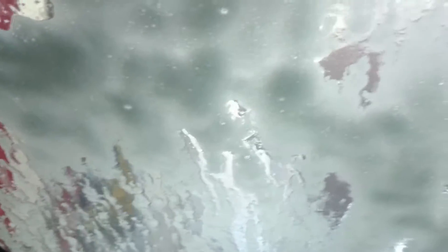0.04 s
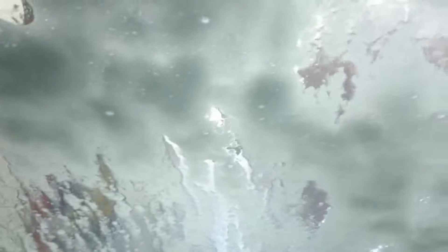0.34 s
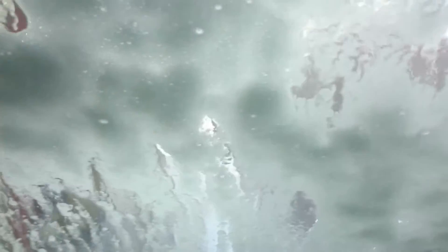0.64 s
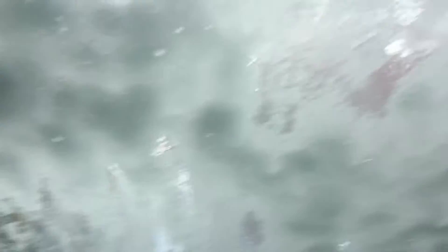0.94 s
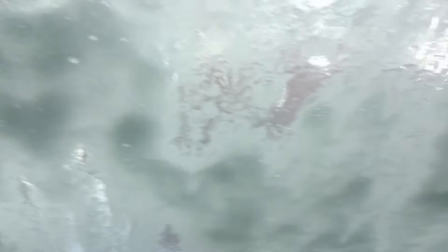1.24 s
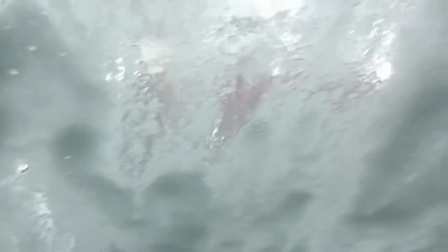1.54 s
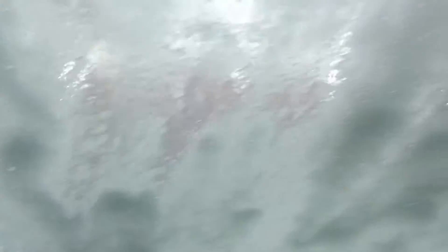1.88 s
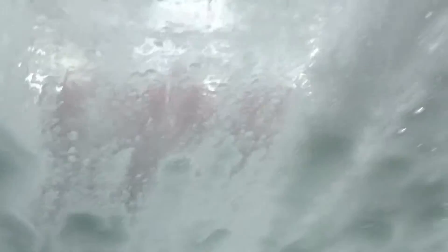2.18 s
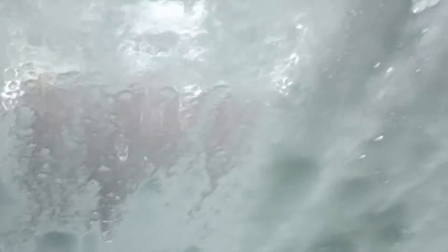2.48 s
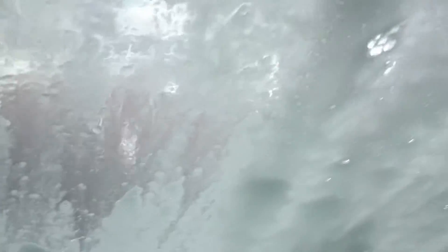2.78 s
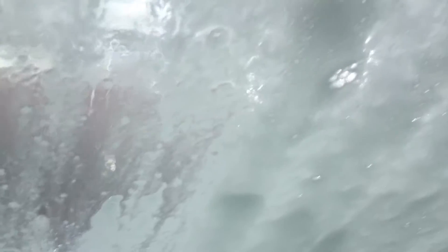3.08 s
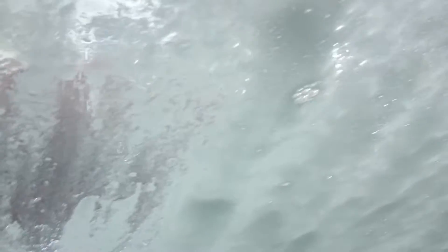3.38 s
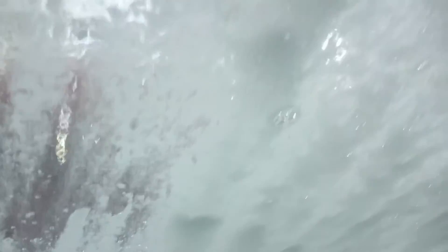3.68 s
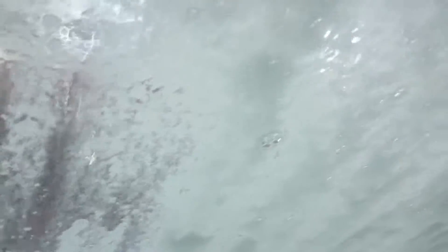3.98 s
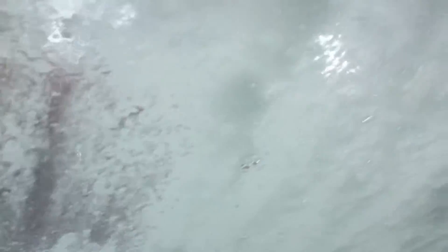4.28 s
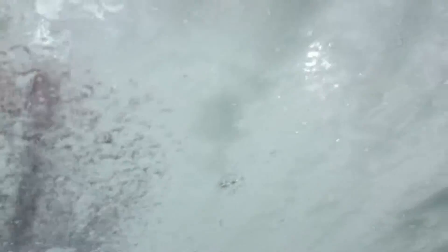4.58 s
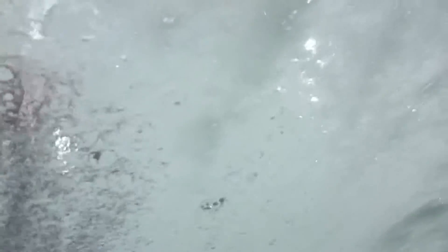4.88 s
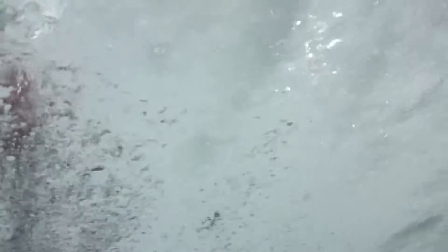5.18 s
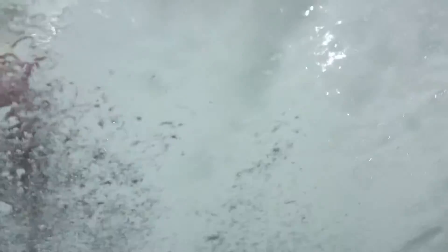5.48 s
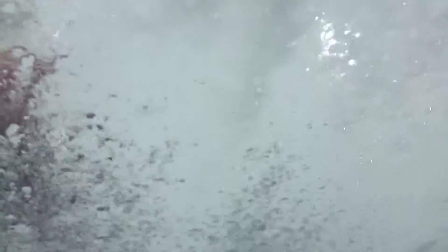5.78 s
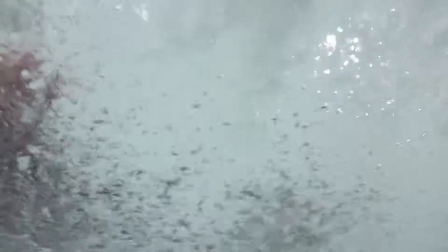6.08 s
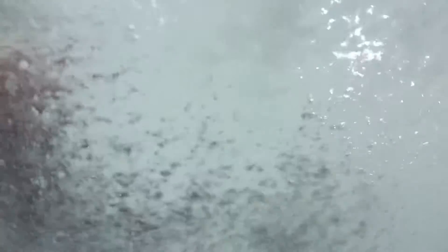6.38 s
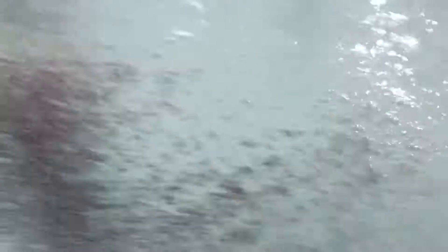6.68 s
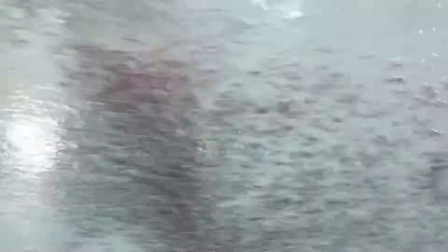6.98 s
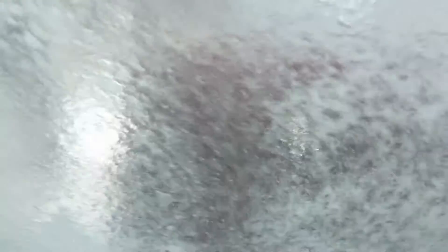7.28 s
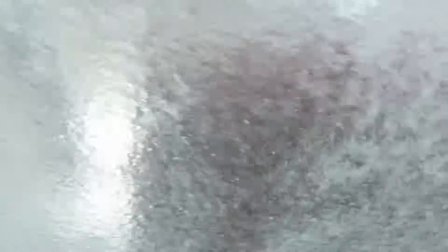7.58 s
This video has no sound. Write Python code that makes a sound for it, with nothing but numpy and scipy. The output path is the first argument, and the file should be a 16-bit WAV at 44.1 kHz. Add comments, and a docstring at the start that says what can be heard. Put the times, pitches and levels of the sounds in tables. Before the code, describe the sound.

Car wash heard from the cabin: rumbling spray, a wavering motor hum, and soaked brush strips thumping the panels and splattering the windshield.

```python
"""Water jets drum and hiss on a car in an automatic car wash, heard from inside, while drive motors hum.
A spinning cloth brush closes in: its wet strips thump the panels and slap the windshield ever harder,
throwing fat drops and a fine spray. The water is a mass of tiny random impacts, the shaking body is
mostly low noise, and thumps and fat drops are short tones. A few sharp ticks sound close by on the right."""
import sys
import numpy as np
from scipy import signal
from scipy.fft import rfft, irfft, next_fast_len
from scipy.io import wavfile
from scipy.ndimage import uniform_filter1d, map_coordinates

SR = 44100
rng = np.random.default_rng(int(sys.argv[2]) if len(sys.argv) > 2 else 0)


def dump(signal):
    """Clip the signal to [-1, 1] and save it as 16-bit WAV at the path in sys.argv[1]."""
    limited = np.clip(np.atleast_2d(signal).T, -1, 1)
    pcm = np.round(limited * 32767).astype(np.int16)
    wavfile.write(sys.argv[1], SR, pcm)


N = 336924

# How close the brush is: t/s, nearness (0 far, 1 near)
BRUSH_NEARNESS = [(0, 0.15), (.8, 0), (1.5, 0.41), (3.0, 0.45), (4.0, 0.62), (5.6, 0.74), (7.64, 1)]
# Loudness over time, each as rows of: t/s, level/dB (relative)
JET_FORCE = [(0, -2.5), (1.6, 0), (2.0, 0), (3.2, 1), (4.5, -0.6), (5.3, 0.4), (6.2, -2.5), (7.64, -1)]  # the jets pass over the roof
SHUDDER_LEVEL = [(0, -32.5), (1.6, -33.5), (2.05, -30), (2.8, -36), (3.4, -27), (3.95, -30.5), (5.0, -28),
                 (6.2, -35), (7.3, -31.5)]  # deep shaking of the body
WATER_LULL = [(5.98, 0), (6.07, -2), (6.2, -1), (6.25, 0)]  # the water eases for a moment
SHEET_LEVEL = [(0, -37), (1.2, -35), (2.3, -32.5), (3.0, -34), (4.2, -32.5), (4.5, -34.5), (5.8, -32),
               (6.1, -34), (7.64, -34.5)]  # water builds up on the glass, then the brush wipes it thinner
MIST_LEVEL = [(0, -77), (1.6, -73.5), (3.3, -66.5), (4.2, -65), (6.4, -60.5), (7.1, -58.5), (7.64, -50)]  # mist flung onto the glass
ROOF_LEVEL = [(0, -32), (1.6, -37.5), (2.0, -23.5), (2.9, -25.5), (3.3, -36), (4.5, -30), (7.64, -47)]  # the roof's drone
HUM_LEVEL = [(0, 4.5), (.45, -0.5), (.8, 4.5), (1.1, -2), (1.75, 0.5), (2.1, -4.5), (2.45, 1), (2.85, -1),
             (3.05, -11), (3.25, -3), (3.8, -2), (4.0, 2.5), (4.5, -7.5), (4.85, 2.5), (5.7, -1.5),
             (5.92, 3), (6.08, -6.5), (6.8, 0), (7.64, -1)]  # the motors' hum swells and sinks
# Two drive motors, nearly in step: f/Hz, level/dB
MOTOR_TONES = [(512.5, -36.5), (503, -41)]

# The hardest strips on the glass: t/s, strength/dB, brightness/dB, flatness of the landing/dB
HARD_STRIPS = [(1.9544, -33, -7, -4), (2.4094, -37, -12.5, -7.5), (2.6733, -33.5, -11, 2),
               (3.1847, -29, -11.5, -6), (3.255, -28.5, -9, -2.5), (3.335, -29.5, -1.5, -3.5),
               (3.683, -36, 3, 8.5), (3.9554, -36.5, -6, 4), (4.121, -33, -12.5, -11),
               (4.2258, -27, -5, -8), (4.3244, -32, -12, -0.5), (4.552, -36.5, 5.5, -4),
               (4.6299, -32, 2, 5.5), (4.6527, -26, -1, -1.5), (4.7247, -25.5, -2.5, -7),
               (4.7677, -28, -4, 5.5), (4.795, -29, -3.5, -3.5), (4.8728, -29, -9, 1.5),
               (4.9538, -26, 0, -0.5), (4.9816, -23, -4, -6), (5.062, -26, -6.5, -1.5),
               (5.1407, -28, 1, 4.5), (5.2388, -32.5, -12, 3), (5.279, -26.5, -3, 1.5),
               (5.445, -31, -9.5, -1), (5.5095, -34, 4, -3.5), (5.5653, -28, -1, -4), (5.6293, -25, -1, -2),
               (5.675, -34.5, -7, 2.5), (5.7059, -26, -2, -6), (5.8067, -23, -6.5, 1),
               (5.840, -23, 4.5, -13), (5.896, -22.5, -9, -3), (5.9166, -27.5, -1.5, -1),
               (5.965, -24.5, -2, -8), (6.113, -25, -5.5, -11), (6.2327, -28.5, -3, -7.5),
               (6.261, -31, 2.5, -8), (6.3045, -24, -4, -4.5), (6.355, -32, -5.5, -1.5),
               (6.415, -36.5, 1, -1.5), (6.4634, -25, -3, -3.5), (6.5196, -26, -2, -4.5),
               (6.538, -24, -5, -4.5), (6.585, -32, -5.5, -3.5), (6.6543, -25.5, 3, -6.5),
               (6.69, -27.5, -10, -11.5), (6.7046, -23.5, 0.5, -15), (6.7488, -23.5, -1.5, -4.5),
               (6.775, -22.5, -1, -9), (6.795, -21, -5.5, -4.5), (6.8983, -26.5, -2, -4),
               (6.9304, -36, 6, -10), (6.9758, -26.5, 1.5, -6), (7.014, -27.5, 2, -4.5),
               (7.0767, -32.5, 4, -14), (7.128, -30, 0, -1), (7.186, -29, -6, 4.5), (7.205, -25, 0, -1.5),
               (7.238, -25, -0.5, -12.5), (7.2896, -27.5, 3, 2), (7.337, -30.5, 3.5, 3),
               (7.422, -26.5, -4, -3), (7.4747, -27.5, 6, -1), (7.4934, -30.5, 2.5, -3.5),
               (7.5963, -26.5, 0, -6)]
# Heavy blows on the body panels: t/s, peak level/dB, f/Hz, swell time/s
PANEL_BLOWS = [(0.257, -12, 111.7, 0.029), (2.136, -11.5, 114, 0.025), (2.408, -17, 95.5, .014),
               (2.701, -6.5, 84, 0.011), (2.844, -7.5, 107.6, 0.016), (3.605, -9, 113, 0.015),
               (3.776, -8.5, 74, .02), (4.067, -10.5, 76, 0.013), (4.186, -9.5, 81, 0.015),
               (4.328, -8, 81, 0.012), (4.483, -10, 70, .018), (4.738, -9.5, 81, 0.01),
               (5.028, -12, 85, 0.018), (5.212, -12, 88, 0.013), (5.297, -12.5, 79, 0.012),
               (5.423, -5, 79, 0.018), (5.647, -14, 87, .01), (5.785, -13, 73.8, 0.021),
               (5.901, -11, 86, 0.01), (5.966, -9, 72, .034), (6.042, -11, 77, 0.016),
               (6.144, -4.5, 82.5, 0.015), (6.348, -11, 73.5, 0.024), (6.426, -8.5, 76, 0.012),
               (6.548, -12, 73, 0.019), (6.878, -8, 85, 0.014), (6.994, -11, 79.5, 0.012),
               (7.050, -9.5, 74.6, 0.024), (7.253, -13.5, 79.5, 0.011), (7.398, -11, 78.5, .015),
               (7.592, -14.5, 85, 0.015)]
# Close, sharp clicks: t/s, strength/dB, treble cutoff f/Hz
TICK_HITS = [(0.7268, -21, 900), (0.8976, -27.5, 11000), (2.676, -39.5, 11950), (3.2793, -22.5, 16000),
             (3.727, -19.5, 16000), (4.0898, -20.5, 16000), (5.681, -32, 16000), (6.475, -29, 16100)]
# Big drops that make the glass ring: t/s, strength/dB, f/Hz
FAT_DROP_HITS = [(3.682, -24.5, 2370), (3.690, -27.5, 2900), (4.632, -29, 2130), (4.769, -27.5, 2550),
                 (4.954, -27.5, 3960), (4.982, -24, 2650), (5.145, -37, 3980), (5.241, -29.5, 1795),
                 (5.292, -33.5, 3750), (5.509, -27, 3510), (5.564, -26, 3370), (5.840, -22, 3880),
                 (5.967, -35, 4000), (6.234, -33.5, 3700), (6.260, -32.5, 3960), (6.520, -29, 3430),
                 (6.654, -29.5, 3740), (6.794, -29, 3670), (6.930, -36, 3920), (7.014, -26.5, 3970),
                 (7.186, -24, 2100), (7.209, -22, 3620), (7.290, -28, 3650), (7.343, -28.5, 2430),
                 (7.474, -34.5, 3600)]
# Handfuls of droplets on the glass: t/s, level/dB
SPATTER_HITS = [(4.175, -48.5), (4.438, -51.5), (4.648, -47), (4.985, -51), (5.629, -51.5), (5.841, -47.5),
                (6.303, -51), (6.703, -44.5), (7.016, -45)]

# Tone colours (how strong each frequency is), each as rows of: f/Hz, level/dB (relative)
SHUDDER_COLOUR = [(12, -40), (24, -18), (32, -1), (41, 10.5), (52, 13), (66, -14.5), (100, -57.5)]  # deepest shaking of the body
BOOM_COLOUR = [(30, -40.5), (47, -2.5), (57, 15), (72, 15.5), (88, 12.5), (105, -6), (160, -64)]  # brush against the body
PANEL_COLOUR = [(65, -39), (95, -9.5), (113, -1.5), (130, -8.5), (160, -6.5), (195, -16), (260, -28),
                (400, -91)]  # drumming panels
ROAR_COLOUR = [(130, -28.5), (200, -0.5), (250, -2), (320, -1.5), (390, -5.5), (470, -8), (580, -13),
               (720, -19), (1100, -25.5), (3000, -78)]  # jets on the body
SHEET_COLOUR = [(350, -15), (600, -2.5), (820, -5), (1080, -0.5), (1500, -5), (1900, -6), (2400, -13),
                (3500, -22), (7000, -58)]  # sheet of water on the glass
HISS_COLOUR = [(1200, -25), (2200, -1), (2800, 0.5), (3500, -1), (4500, -6), (5300, -13.5), (6300, -21),
               (8000, -33), (15000, -49.5)]  # dense small drops
MIST_COLOUR = [(3500, -18.5), (6500, 6), (8000, 0.5), (9500, -1), (11500, -2), (13500, -6), (16000, -8)]  # finest spray
SMACK_COLOUR = [(130, -21.5), (280, -8.5), (430, 4.5), (750, -3), (1120, 1), (1450, -5.5), (1900, -6),
                (3300, -48.5)]  # a strip knocks the glass
SLAP_COLOUR = [(600, -27.5), (1300, -7), (1850, 3.5), (2400, -1.5), (3000, -6), (4000, -20.5),
               (8000, -46.5)]  # a strip lands flat
SPLASH_COLOUR = [(1500, -41.5), (2900, 0.5), (3700, 4.5), (4400, -4), (5300, -7), (6500, -21), (9000, -34),
                 (15000, -42)]  # water flung off a strip
TICK_COLOUR = [(1000, -19), (2500, -4), (4500, 4.5), (6500, -0.5), (8500, -17), (11500, -3.5), (15500, -7)]  # close clicks
CRACK_COLOUR = [(2000, -19), (3200, -2), (3800, 4), (4600, -6.5), (5400, -7), (6800, -21), (9500, -31),
                (15000, -30.5)]  # a fat drop bursts
SPATTER_COLOUR = [(2000, -15.5), (4500, 12.5), (6200, 7), (8000, -4), (11500, -5.5), (15500, -9.5)]  # droplets on bare glass
PING_COLOUR = [(2600, -33), (3350, -3.5), (3680, -7.5), (4000, -9), (5000, -35.5)]  # single drops
# How alike left and right sound in the cabin: f/Hz, likeness (0 unrelated, 1 the same)
STEREO_LIKENESS = [(60, 0.84), (130, 0.94), (290, 0.91), (640, 0.35), (1100, 0.64), (1700, 0), (3000, 0)]
# How much louder the left is than the right: f/Hz, level/dB
STEREO_TILT = [(60, -3.5), (400, -3.5), (750, -2.5), (970, -6.5), (1300, -1), (1800, 3.5), (2500, 0.5),
               (3100, 0.5), (3800, -4), (5200, -7), (6500, -2), (8000, 6), (11500, -1), (15000, -0.5)]


def amp(db):
    """Turn decibels into a number to multiply by."""
    return 10 ** (np.asarray(db) / 20)


def unit(x):
    """Scale a signal to an average power of 1."""
    return x / np.sqrt(np.mean(x ** 2) + 1e-20)


def at_hz(table, hz):
    """Read a table between its rows, on a logarithmic frequency scale."""
    freqs, values = np.transpose(table)
    return np.interp(np.log(hz + 1), np.log(freqs + 1), values)


def curve(table):
    """Join a table's points in time with straight lines, one value per sample."""
    return np.interp(np.arange(N) / SR, *np.transpose(table))


def wobble(rate):
    """A smooth curve through `rate` random points a second."""
    points = rng.standard_normal(2048)
    steps = np.arange(0, N, 64)
    return np.interp(np.arange(N), steps, map_coordinates(points, [steps * rate / SR], mode="mirror"))


def filtered(x, response):
    """Multiply each frequency in x by response(hz)."""
    size = next_fast_len(N + 8192, real=True)
    return irfft(rfft(x, size) * response(np.fft.rfftfreq(size, 1 / SR)), size)[..., :N]


def noise():
    """Three unrelated white noises, as cabin() needs."""
    return rng.standard_normal((3, N))


def drops(per_second, spread_db):
    """Three streams of tiny random impacts, some bigger than the rest."""
    hit = rng.random((3, N)) < per_second / SR
    size = noise()
    return unit(hit * np.sign(size) * amp(spread_db * np.abs(size)))


def patchy(x, depth_db):
    """Shift the colour from moment to moment, as water lands on different spots."""
    slices = signal.stft(x, nperseg=512)[2]
    patches = uniform_filter1d(rng.standard_normal(slices.shape[1:]), size=9, axis=0)  # smooth in pitch
    patches = uniform_filter1d(patches, size=6, axis=1)  # and in time
    return signal.istft(slices * amp(depth_db * np.clip(unit(patches), -2, 2)), nperseg=512)[1][:, :N]


def cabin(x, colour, direct=0, lag_ms=0.37):
    """Colour three streams and mix to stereo: two fill the cabin, one comes straight, right side first."""
    size = next_fast_len(N + 8192, real=True)
    hz = np.fft.rfftfreq(size, 1 / SR)
    mid, side, straight = rfft(x, size) * unit(amp(at_hz(colour, hz)))
    width = np.arccos(np.clip(at_hz(STEREO_LIKENESS, hz), -1, 1)) / 2
    mid, side = mid * np.cos(width), side * np.sin(width)
    delay = np.exp(-2j * np.pi * hz * lag_ms / 1000)
    left = mid + side + direct * straight * delay
    right = mid - side + direct * straight
    return irfft(np.array([left, right]), size)[:, :N] / np.hypot(1, direct)


def steadied(x, evenness):
    """Even out the slow chance swells of a low noise (0 not at all, 1 fully)."""
    power = np.abs(uniform_filter1d(np.mean(x ** 2, axis=0), size=6000)) + 1e-6
    return unit(x * power ** (-evenness / 2))


def water():
    """Dense drops hit glass and roof: the flow surges, the hiss grows as the brush nears, mist crackles."""
    hiss_db = -44 + 4 * curve(BRUSH_NEARNESS) ** 2
    surge = wobble(30)
    sheet = cabin(patchy(drops(per_second=4000, spread_db=1.5), depth_db=1.34), SHEET_COLOUR, direct=0.81)
    hiss = cabin(patchy(drops(per_second=12000, spread_db=5), depth_db=0.64), HISS_COLOUR, direct=0.51)
    mist = cabin(drops(per_second=4900, spread_db=1.5), MIST_COLOUR, direct=0.5, lag_ms=0.25)
    sheet *= amp(curve(SHEET_LEVEL) + 0.77 * surge)
    hiss *= amp(hiss_db + 1.1 * surge)
    mist *= amp(curve(MIST_LEVEL) + 1.4 * surge)
    return amp(curve(WATER_LULL)) * (sheet + hiss + mist)


def car_body():
    """Brush and jets shake the car: a deep shudder, a growing boom, drumming panels and a roar."""
    near, jets_db = curve(BRUSH_NEARNESS), curve(JET_FORCE)
    shudder = amp(curve(SHUDDER_LEVEL)) * steadied(cabin(noise(), SHUDDER_COLOUR), evenness=0.82)
    boom = amp(-26.5 + 8 * near) * steadied(cabin(noise(), BOOM_COLOUR), evenness=0.14)
    panels = amp(-21 + jets_db) * steadied(cabin(noise(), PANEL_COLOUR), evenness=0.97)
    shield_db = near * (-2 + 2.1 * wobble(18))  # the brush shields the car from the jets
    roar_db = -22.5 + 0.48 * jets_db + shield_db + curve(WATER_LULL)
    roar = steadied(cabin(drops(per_second=4000, spread_db=4.5), ROAR_COLOUR), evenness=0.81)
    return shudder + boom + panels + amp(roar_db) * roar


def roof_drone(ring_hz=113, waver_hz=11, flutter_db=3):
    """The roof drones unsteadily at its own pitch, loudest with the jets right above it."""
    phase = 2 * np.pi * np.cumsum(ring_hz + waver_hz * wobble(45)) / SR
    flutter = amp(flutter_db * np.clip(wobble(22), -2, 1))
    return amp(curve(ROOF_LEVEL)) * unit(flutter * np.sin(phase))


def motors(waver_hz=3.51, drift_hz=1.47, flutter_db=5):
    """Two motor hums flicker with the load and, being close in pitch, pulse against each other."""
    hum = np.zeros(N)
    for hz, db in MOTOR_TONES:
        phase = 2 * np.pi * np.cumsum(hz + drift_hz * wobble(6) + waver_hz * wobble(60)) / SR
        flutter = amp(flutter_db * np.clip(wobble(17), -2, 1))
        hum += amp(db) * unit(flutter * np.sin(phase))
    return amp(curve(HUM_LEVEL)) * hum * amp([[0.5], [-0.5]])  # left, right


def with_echo(x, level_db=-17, fade_60db_s=0.075):
    """Add the short, dense echo that bounces off the glass and dashboard."""
    t = np.arange(SR // 25) / SR
    tail = rng.standard_normal((2, len(t))) * amp(-60 * t / fade_60db_s) * (t > 0.001)
    tail /= np.linalg.norm(tail, axis=1, keepdims=True)
    return x + amp(level_db) * signal.fftconvolve(x, tail, axes=1)[:, :N]


def bursts(times, levels_db, rise_s, hold_s):
    """The loudness outline of wet hits: each lands suddenly, then its drops trail off."""
    power, t = np.zeros(N + SR), np.arange(SR // 6) / SR
    shape = (1 - np.exp(-t / rise_s)) / (1 + (t / hold_s) ** 3)
    for start, db in zip(times, levels_db):
        power[round(start * SR):][:len(t)] += (amp(db) * shape) ** 2
    return np.sqrt(power[:N])


def light_strips(per_second=9, spread_db=1.55):
    """Random rows like HARD_STRIPS for the lighter hits, harder and brighter as the brush nears."""
    count = int(per_second * N / SR)
    times = (np.arange(count) + rng.random(count)) / per_second
    near = np.interp(times, *np.transpose(BRUSH_NEARNESS))
    strength_db, bright_db, flat_db = -41 + 5.5 * near, -7 + 8 * near, np.ones(count)
    usual = np.transpose([strength_db, bright_db, flat_db])
    return np.column_stack([times, usual + spread_db * rng.standard_normal((count, 3))])


def strip_slaps():
    """A wet strip smacks the glass, slaps flat and splashes; a bright one splashes more, smacks less."""
    times, db, bright_db, flat_db = np.vstack([HARD_STRIPS, light_strips()]).T
    blobs = unit(amp(1.2 * np.clip(wobble(170), -2, 2)))  # the water arrives in quick clumps
    smack = bursts(times, db - bright_db - 6.5, rise_s=0.0023, hold_s=0.029)
    smack = smack * blobs * drops(per_second=2800, spread_db=3)
    slap = bursts(times, db + flat_db - 3.5, rise_s=0.0003, hold_s=0.022)
    slap = slap * blobs * patchy(drops(per_second=4100, spread_db=2), depth_db=2)
    splash = bursts(times, db + bright_db - 9, rise_s=0.0002, hold_s=0.017)
    splash = splash * blobs * patchy(drops(per_second=4200, spread_db=5), depth_db=2.5)
    return (cabin(smack, SMACK_COLOUR, direct=0.78, lag_ms=0.4) * amp([[-0.7], [0.7]])
            + cabin(slap, SLAP_COLOUR, direct=0.81, lag_ms=0.27)
            + cabin(splash, SPLASH_COLOUR, direct=0.62, lag_ms=0.26) * amp([[-0.5], [0.5]]))


def panel_thumps():
    """A bunch of soaked cloth lands on a panel, which booms for a few swings."""
    out, t = np.zeros(N + SR), np.arange(SR // 4) / SR
    for start, db, hz, swell_s in PANEL_BLOWS:
        shape = (t / swell_s * np.exp(1 - t / swell_s)) ** 2
        out[round(start * SR):][:len(t)] += amp(db) * shape * np.sin(2 * np.pi * hz * t)
    return out[:N]


def ticks(rattle_s=0.0012, rattle_db=-6):
    """Tiny clicks close on the right, each a spike and a brief rattle; a soft contact is duller."""
    out, t = np.zeros(N + SR), np.arange(SR // 40) / SR
    for start, db, cutoff_hz in TICK_HITS:
        rattle = rng.standard_normal(len(t)) * np.exp(-t / rattle_s)
        click = (t == 0) + amp(rattle_db) * rattle / np.linalg.norm(rattle)
        click = signal.lfilter(*signal.butter(1, cutoff_hz, fs=SR), click)
        out[round(start * SR):][:len(t)] += amp(db + 9) * click / np.linalg.norm(click)
    return filtered(out[:N], lambda hz: amp(at_hz(TICK_COLOUR, hz))) * amp([[-18], [3]])


def fat_drops(rise_s=0.0003, decay_s=0.0095, pitch_blur=0.054, ring_db=1.5, crack_db=-12.5):
    """A big drop bursts with a crack; the glass rings briefly at a pitch set by where it lands."""
    rings, t = np.zeros((2, N + SR)), np.arange(SR // 16) / SR
    waver = 1 + pitch_blur * np.array([wobble(330), wobble(330)])
    shape = (1 - np.exp(-t / rise_s)) * np.exp(-t / decay_s)
    for start, db, hz in FAT_DROP_HITS:
        i = round(start * SR)
        phase = 2 * np.pi * np.cumsum(hz * waver[:, i:i + len(t)], axis=1) / SR
        rings[:, i:i + len(t)] += amp(db + ring_db) * shape * np.sin(phase)
    times, db, _ = np.transpose(FAT_DROP_HITS)
    outline = bursts(times, db + crack_db, rise_s=0.0002, hold_s=0.0034)
    cracks = outline * drops(per_second=12000, spread_db=4.5)
    return rings[:, :N] + cabin(cracks, CRACK_COLOUR, direct=0.9, lag_ms=0.25)


def spatters():
    """Handfuls of flung droplets crackle on bare glass."""
    times, db = np.transpose(SPATTER_HITS)
    crackle = bursts(times, db, rise_s=0.0008, hold_s=0.028) * drops(per_second=1100, spread_db=3.5)
    return cabin(crackle, SPATTER_COLOUR, direct=0.9, lag_ms=0.25)


def drop_pings():
    """Single drops keep pinging on the glass, very faint until the brush is close."""
    level_db = -83 + 36 * curve(BRUSH_NEARNESS)
    return amp(level_db) * cabin(drops(per_second=160, spread_db=5), PING_COLOUR, direct=0.64, lag_ms=0.25)


def hollow_knock(start_s=5.889, level_db=-15, hz=451, swell_s=0.0067):
    """One strip hits a hollow part of the body, which gives a short knock."""
    t = np.maximum(np.arange(N) / SR - start_s, 0)
    shape = t / swell_s * np.exp(1 - t / swell_s)
    return amp(level_db) * shape * np.sin(2 * np.pi * hz * t)


def scene():
    """Everything that reaches the front seats; only the sounds on the glass get an echo."""
    glass = water() + strip_slaps() + spatters() + fat_drops() + drop_pings()
    shell = car_body() + roof_drone() + panel_thumps() + hollow_knock()
    return shell + motors() + with_echo(glass) + ticks()


def record(dry):
    """Colour left and right a little differently, and cut the very highest treble."""
    half_each, top_hz = np.array([[0.5], [-0.5]]), 15850
    return filtered(dry, lambda hz: amp(half_each * at_hz(STEREO_TILT, hz)) * (hz < top_hz))


dry = scene()
out = record(dry)
dump(out)
```